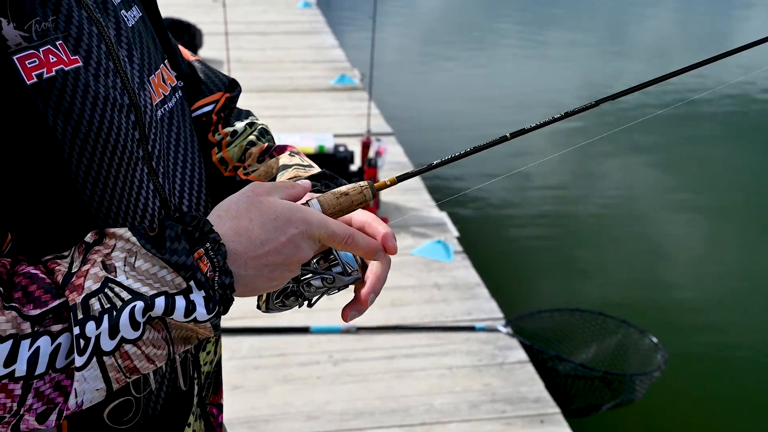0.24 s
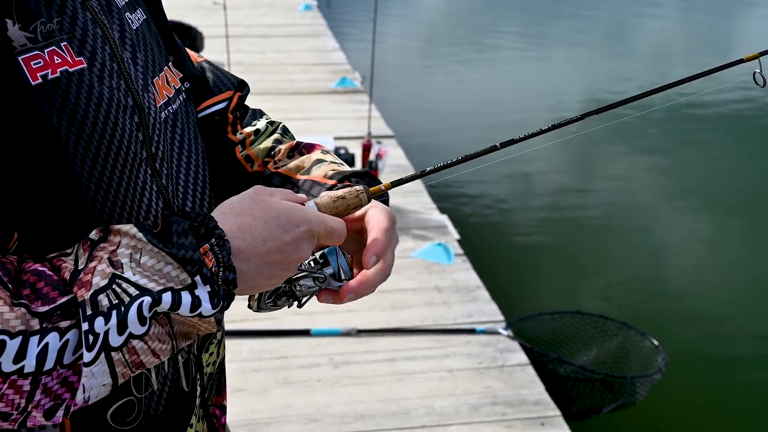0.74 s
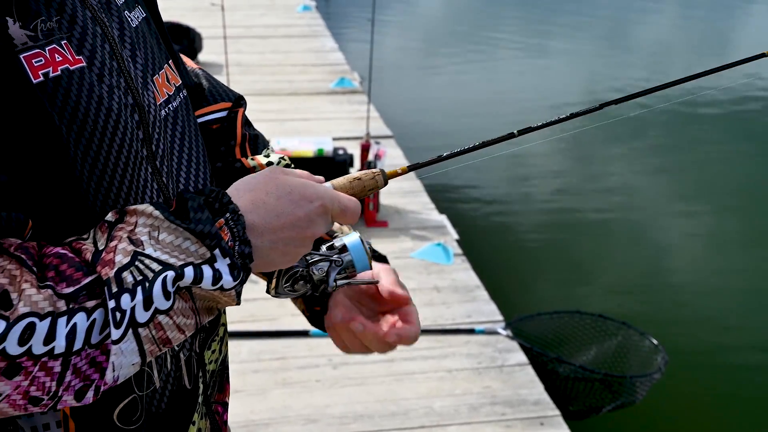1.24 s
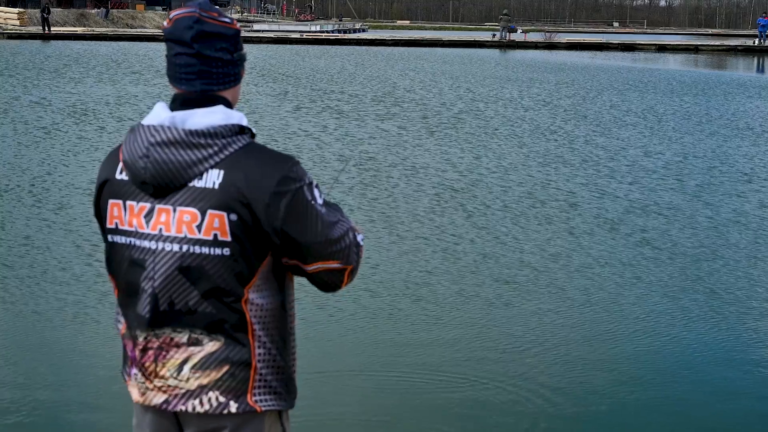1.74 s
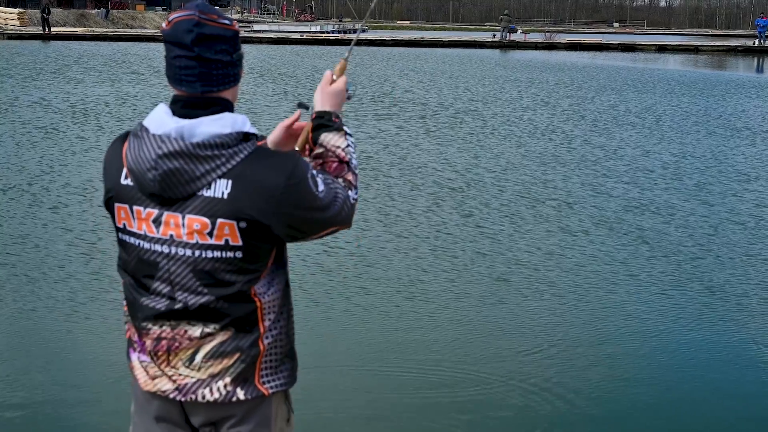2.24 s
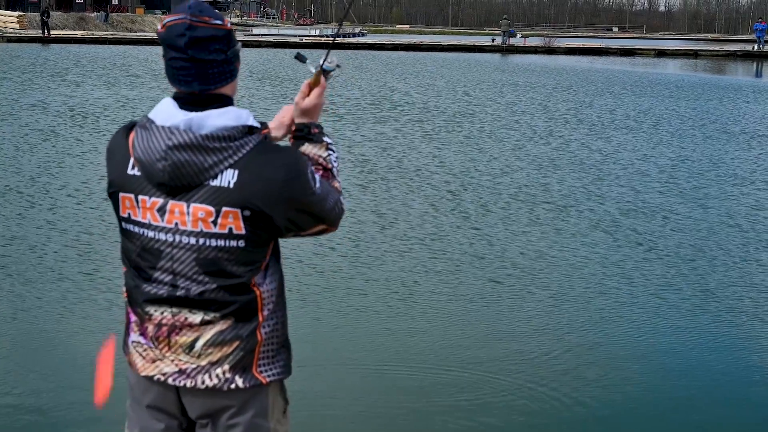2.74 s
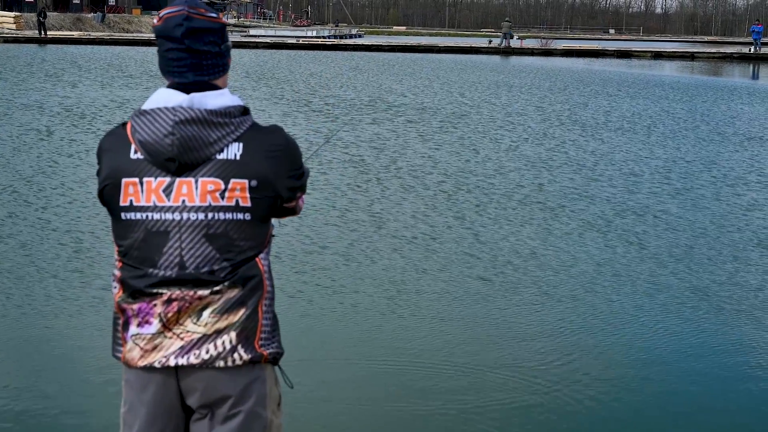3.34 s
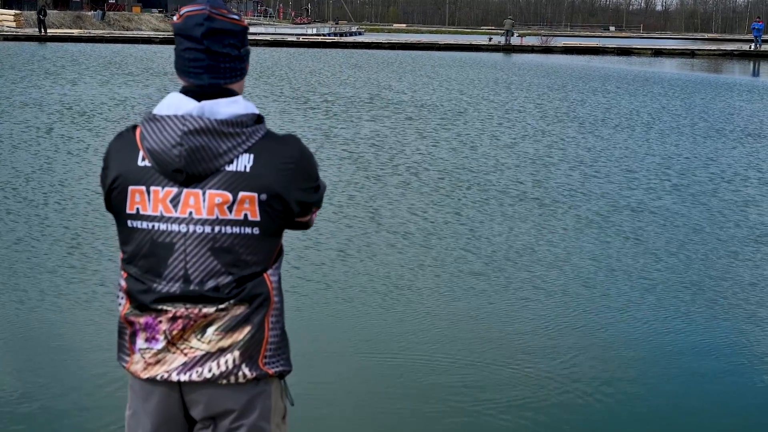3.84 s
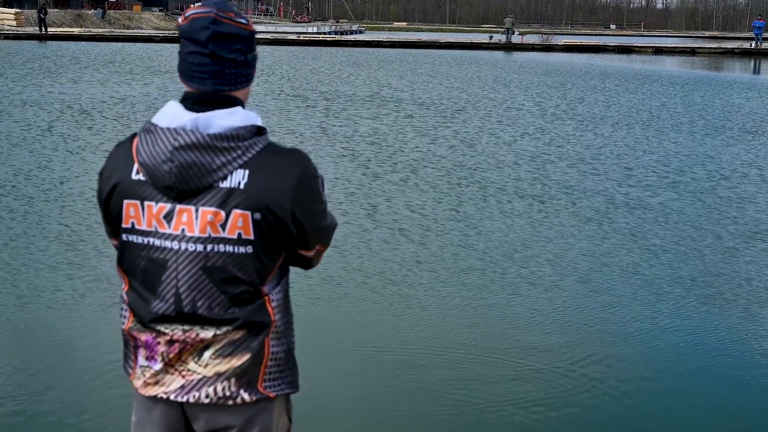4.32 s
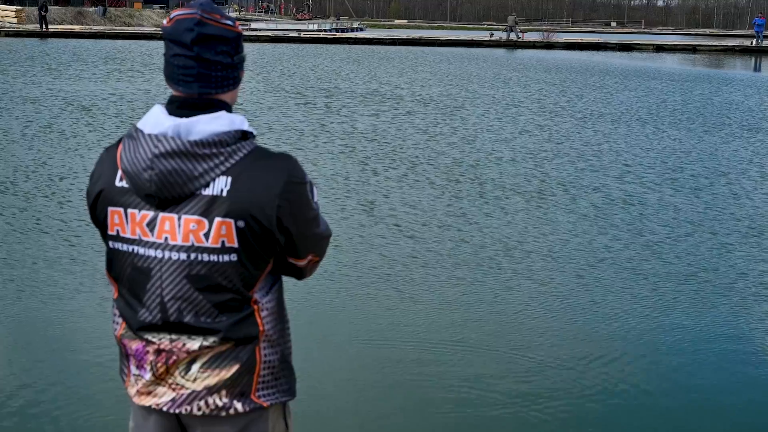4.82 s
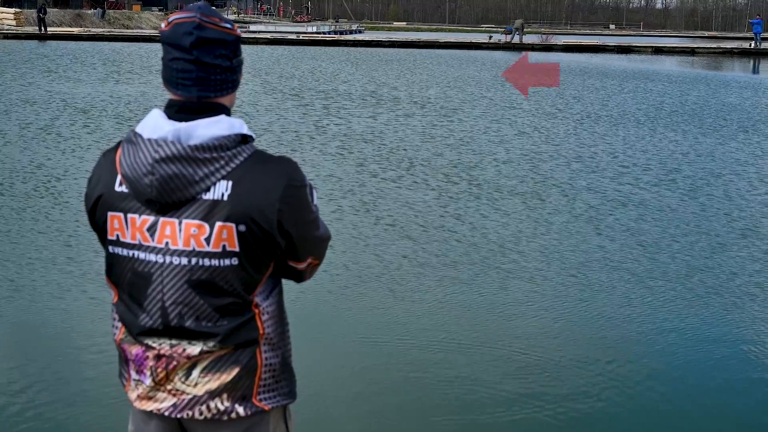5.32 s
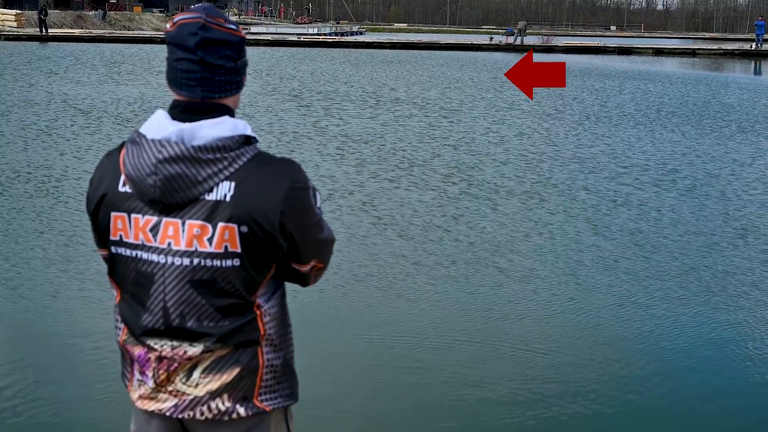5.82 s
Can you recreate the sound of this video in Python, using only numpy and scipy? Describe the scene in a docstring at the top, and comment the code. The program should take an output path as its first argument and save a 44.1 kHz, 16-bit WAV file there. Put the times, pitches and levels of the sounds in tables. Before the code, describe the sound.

A fishing reel clatters twice, then the rod whips with a sharp crack and whoosh, and line hisses away outdoors.

```python
"""By a pond, in a light breeze, a spinning rod is cast. The reel clatters twice as the bail is opened,
and its wire rings. Sleeves rustle as the rod goes back; it whips forward with a crack and a falling
whoosh of shed eddies. Line hisses off the spool, fainter and duller as drag slows the lure.
The tackle ticks, small waves lap, and a faint splash comes from out on the water."""
import sys
import numpy as np
from scipy import signal
from scipy.fft import rfft, irfft, next_fast_len
from scipy.io import wavfile
from scipy.ndimage import map_coordinates

SR = 44100
rng = np.random.default_rng(int(sys.argv[2]) if len(sys.argv) > 2 else 0)


def wrap_up_sound(samples):
    """Save the sound to the file named by the first command line argument, as 16-bit audio."""
    columns = np.atleast_2d(samples).T
    # keep every value between -1 and 1, then stretch to whole-number steps
    tamed = np.clip(columns, -1, 1)
    steps = np.round(tamed * 32767).astype(np.int16)
    wavfile.write(sys.argv[1], SR, steps)


N = 267687
TIME_S = np.arange(N) / SR
HAND_STOP_S, CRACK_S, FASTEST_S = 0.925, 2.928, 3.202  # hand damps reel, tip cracks, line runs fastest


def amp(db):
    """Decibels to gain."""
    return 10 ** (np.asarray(db) / 20)


def pan(left_db):
    """Stereo gains: left up, right down by left_db."""
    return amp([[left_db], [-left_db]])


def unit(x):
    """Scale to rms 1."""
    return x / np.sqrt(np.mean(x ** 2) + 1e-20)


def unit_hit(x):
    """Scale to the energy of 5 ms at rms 1."""
    return x / np.sqrt(np.sum(x ** 2) / (SR / 200))


def add(track, start_s, x):
    """Mix x into the track."""
    part = track[..., round(start_s * SR):][..., :x.shape[-1]]
    part += x[..., :part.shape[-1]]


def along(points, hz):
    """Interpolate (Hz, value) points on a log axis."""
    knots_hz, values = np.transpose(points)
    return np.interp(np.log(hz + 1), np.log(knots_hz + 1), values)


def filtered(x, response):
    """Apply a complex frequency response."""
    size = next_fast_len(x.shape[-1] + SR // 8)
    return irfft(rfft(x, size) * response(np.fft.rfftfreq(size, 1 / SR)), size)[..., :x.shape[-1]]


def coloured(x, spectrum):
    """Shape x by (Hz, dB) points."""
    return filtered(x, lambda hz: amp(along(spectrum, hz)))


def resonate(x, modes):
    """Pass x through (Hz, width Hz, dB) resonances of alternating sign."""
    return filtered(x, lambda hz: sum(
        (-1) ** k * amp(db) * 1j * hz * width / (centre ** 2 - hz ** 2 + 1j * hz * width)
        for k, (centre, width, db) in enumerate(modes)))


def swept(x, track_hz, gain):
    """Moving filter, output rms 1; gain is a function of octaves above the track."""
    hz, t, frames = signal.stft(x, SR, nperseg=1024)
    band = gain(np.log2((hz[:, None] + 20) / np.interp(t, TIME_S, track_hz)))
    power = np.mean(np.abs(frames) ** 2, axis=(0, 2)) @ band ** 2
    return unit(signal.istft(frames * band / np.sqrt(power + 1e-30), SR, nperseg=1024)[1][:, :N])


def wobble(rate_hz):
    """Random knots joined by straight lines."""
    return map_coordinates(rng.standard_normal(N // 8), [TIME_S * rate_hz], order=1)


def noise(spectrum):
    """Mono noise of rms 1, shaped by (Hz, dB) points."""
    return unit(coloured(rng.standard_normal(N), spectrum))


def wide_noise(spectrum, correlation):
    """Stereo noise of rms 1 with (Hz, left-right correlation) points."""
    def response(hz):
        angle = np.arccos(np.clip(along(correlation, hz), -1, 1)) / 2
        return amp(along(spectrum, hz)) * [np.cos(angle), np.sin(angle)]
    mid, side = filtered(rng.standard_normal((2, N)), response)
    return unit(np.array([mid + side, mid - side]))


def burst(t60_s, grain_db=4, impact=9):
    """One clean impact and a dying spurt of uneven micro-impacts."""
    t = np.arange(SR // 4) / SR
    sizes = amp(grain_db * np.interp(t, np.arange(1000) / 4000, rng.standard_normal(1000)))
    spurt = rng.standard_normal(len(t)) * sizes * amp(-60 * t / max(t60_s, 1e-3))
    spurt[20] += impact
    return spurt


def decay(start_s, t60_s):
    """Envelope: 1 until start_s, then dying."""
    return amp(-60 * np.maximum(TIME_S - start_s, 0) / t60_s)


def pulse(start_s, t60_s, attack_s):
    """Envelope: opens at start_s and dies."""
    age_s = np.maximum(TIME_S - start_s, 0)
    return (1 - np.exp(-age_s / attack_s)) * decay(start_s, t60_s)


def swell(peak_s, hold_s, rise_s, t60_s):
    """Envelope: climbs 60 dB in rise_s, reaches 1 at peak_s, holds, dies."""
    return amp(-60 * np.maximum(peak_s - TIME_S, 0) / rise_s) * decay(peak_s + hold_s, t60_s)


def swells(rows, rise_s, t60_s):
    """Power sum of (peak s, hold s, dB) swells."""
    return np.sqrt(sum((amp(db) * swell(s, hold_s, rise_s, t60_s)) ** 2 for s, hold_s, db in rows))


# Puffs of air. Each row: peak time in seconds, hold in seconds, level in dB.
GUSTS = [(0.0, .04, -64), (0.22, .01, -76.5), (0.55, 0.3, -65.5), (1.05, .05, -75.5), (1.37, 0.086, -61),
         (1.68, 0.028, -63.5), (1.79, 0.031, -60.5), (1.97, 0.43, -64.5), (2.44, 0.074, -62.5),
         (2.85, .05, -66)]
# Wind spectrum. Each row: frequency in Hz, level in dB.
BREEZE_SPECTRUM = [(15, -30.5), (25, 3), (121, -4), (200, -6), (555, -13), (817, -12), (1300, -20),
                   (2180, -25), (2360, -30.5), (12000, -51), (15600, -79), (22000, -120)]


def breeze(gain_db=2.5):
    """Soft puffs of air pass the angler."""
    return amp(gain_db) * swells(GUSTS, rise_s=0.73, t60_s=0.84) * noise(BREEZE_SPECTRUM)


# Hush of the pond. Each row: frequency in Hz, level in dB.
POND_SPECTRUM = [(20, -7), (60, 7.5), (110, -2), (250, -14.5), (700, -16.5), (1500, -23), (3000, -34.5),
                 (6000, -37.5), (11000, -41), (13000, -57.5)]
# Small waves. Each row: peak time in seconds, hold in seconds, level in dB.
WAVES = [(4.55, .13, -72.5), (4.95, 0.11, -68.5), (5.485, .005, -63.5), (5.6, 0.053, -79),
         (5.86, 0.021, -69.5)]


def pond(hush_db=-64, flutter_db=2.7):
    """The hush of open water sets in at the crack; later small waves lap."""
    hush = amp(hush_db + wobble(6)) * wide_noise(POND_SPECTRUM, [(100, 0.98), (2000, 0.894)])
    lapping = amp(flutter_db * wobble(55)) * swells(WAVES, rise_s=0.25, t60_s=0.26)
    water = noise([(150, -14.5), (250, 9.5), (450, -2.5), (900, 1.5), (1600, -14), (3500, -24),
                   (8000, -37)])
    return hush * (TIME_S > CRACK_S) + lapping * water


def splash(start_s=5.828, level_db=-58):
    """A faint, dull splash out on the water."""
    water = noise([(700, -20), (1400, -6), (1750, 8), (2100, 4), (2700, -17.5), (5000, -35),
                   (12000, -43.5)])
    return amp(level_db) * pulse(start_s, t60_s=0.2, attack_s=0.003) * water


# Sleeve strokes. Each row: peak time in seconds, hold in seconds, level in dB, treble gain in dB.
SLEEVE_STROKES = [(1.348, .12, -73.5, 2.5), (1.783, 0.17, -68.5, -9), (2.068, 0.11, -58.5, -7.5),
                  (2.24, .03, -58.5, 0.5), (2.365, 0.18, -62.5, 0), (2.784, .02, -70, 6)]
# Rubbing cloth. Each row: frequency in Hz, level in dB.
CLOTH_SPECTRUM = [(410, -33.5), (700, -7.5), (830, -5), (1330, -7.5), (1800, 0), (2080, -4.5), (2880, -5),
                  (3410, -14), (3790, -13), (4320, -16.5), (5600, -19), (6900, -21.5), (8530, -14),
                  (10000, -20), (12600, -22), (14600, -28), (16000, -30)]


def sleeves(split_hz=7300, grain_db=1.2):
    """Jacket cloth rubs as the rod is drawn back."""
    out = np.zeros(N)
    for peak_s, hold_s, db, treble_db in SLEEVE_STROKES:
        cloth = unit(noise(CLOTH_SPECTRUM) * amp(grain_db * wobble(170)))
        treble = filtered(cloth, lambda hz: hz ** 6 / (hz ** 6 + split_hz ** 6))
        stroke = amp(db) * swell(peak_s, hold_s, rise_s=0.42, t60_s=0.76)
        out += stroke * (cloth - treble + treble * amp(treble_db))
    return out


# Line and reel ticks. Each row: start in seconds, knock level in dB, edge level in dB,
# T60 in seconds, left minus right in dB, edge cutoff in Hz.
TICKS = [(1.465, -59, -68.5, 0.032, 0, 8985), (3.594, -50, -72, 0.037, 2, 4490),
         (3.762, -49.5, -53, 0.032, -8, 4610), (4.283, -58.5, -75, 0.031, 4, 4040),
         (4.457, -54, -73, 0.021, 1, 3986), (4.934, -65.5, -84, 0.08, -3, 3456),
         (5.314, -64.5, -76, .09, 1, 4510), (5.395, -76, -73, 0.041, 17, 15040),
         (5.457, -53.5, -53, 0.036, 0.5, 14900), (5.483, -60.5, -80, .06, 0, 14950),
         (5.598, -84, -74, 0.047, 13, 15020), (5.641, -63.5, -60, 0.078, 12.5, 15000)]
# Knock resonances. Each row: frequency in Hz, width in Hz, level in dB.
TICK_MODES = [(911, 370, 2.5), (1350.7, 133, 3), (1670, 130, 6), (2100, 220, -3), (2476, 100, 1.5)]
# Bright edge of a tick. Each row: frequency in Hz, level in dB.
TICK_EDGE = [(2500, -41), (4000, 12), (4400, 7), (4900, 9), (5400, -3), (5940, 11), (7000, 3), (9500, 0.5),
             (14000, 7), (15500, -6), (16500, -25)]


def ticks():
    """The tackle gives small dry knocks, some with a bright edge."""
    out = np.zeros((2, N))
    for start_s, knock_db, edge_db, t60_s, balance_db, cutoff_hz in TICKS:
        knock = coloured(resonate(burst(t60_s), TICK_MODES), [(3000, -1), (7000, -12)])
        edge = coloured(burst(0.7 * t60_s), TICK_EDGE)
        edge = filtered(edge, lambda hz: 1 / (1 + (hz / cutoff_hz) ** 6))
        tick = amp(knock_db) * unit_hit(knock) + amp(edge_db) * unit_hit(edge)
        add(out, start_s, tick * pan(balance_db / 2))
    return out


def grip(level_db=-54):
    """The hand rumbles on the rod while it works the reel."""
    rumble = noise([(25, 2.5), (60, -9), (130, -20), (600, -13), (1500, -29), (5000, -60)])
    return amp(level_db) * swell(peak_s=0.36, hold_s=0.54, rise_s=0.12, t60_s=0.11) * rumble


# Slides in the reel. Each row: peak time in seconds, hold in seconds, level in dB.
SLIDES = [(0.335, .02, -54), (0.385, .045, -34.5), (0.465, 0.026, -27), (0.58, .11, -58),
          (0.72, 0.046, -38), (0.80, .015, -30.5), (0.85, 0.061, -20.5)]
# Sliding friction. Each row: frequency in Hz, level in dB.
SLIDE_SPECTRUM = [(59, -46.5), (100, -18.5), (634, -17), (1200, -3), (1650, -6), (1950, -6), (2220, -11),
                  (3250, -8.5), (4200, -10.5), (4980, -16.5), (8280, -18), (10200, -22), (11900, -21),
                  (14700, -28.5), (16000, -46)]


def reel_scrape(gain_db=-2, grain_db=4):
    """Reel parts scrape between contacts."""
    friction = unit(noise(SLIDE_SPECTRUM) * amp(grain_db * wobble(700)))
    return amp(gain_db) * swells(SLIDES, rise_s=0.086, t60_s=0.21) * friction


# Blows on the bail. Each row: start in seconds, low-mode gain in dB, high-mode gain in dB.
BAIL_BLOWS = [(0.475, -15.5, -11), (0.481, -21.5, -36), (0.719, -36, -32.5), (0.771, -43.5, -28.5),
              (0.838, -32.5, -28.5), (0.898, -25, -20.5)]
# Wire modes. Each row: frequency in Hz, level in dB, T60 in seconds.
WIRE_MODES = [(1160, -6, 0.084), (1893, -2, 0.1), (3680, -15, .12), (4540, -9.5, 0.071), (4452, -19.5, .12),
              (8400, -24, .07), (11600, 1.5, 0.029), (11600, -24.5, 0.19), (12210, -8, .06),
              (13800, -17, .05)]


def bail_wire(split_hz=6000, scatter_db=4.4, detune=0.00087):
    """The springy wire rings after each blow until the hand closes on it."""
    out, t = np.zeros(N), np.arange(SR // 2) / SR
    for start_s, low_db, high_db in BAIL_BLOWS:
        for hz, db, t60_s in WIRE_MODES:
            level_db = db + (low_db if hz < split_hz else high_db) + rng.normal(0, scatter_db)
            tone = np.sin(2 * np.pi * hz * (1 + rng.normal(0, detune)) * t)
            add(out, start_s, amp(level_db - 60 * t / t60_s) * tone)
    return out * decay(HAND_STOP_S, t60_s=0.018)


# Hinge resonances. Each row: frequency in Hz, width in Hz, level in dB.
HINGE_MODES = [(1870, 60, -2.5), (4160, 220, 1), (4567, 260, 0.5), (5953, 600, -11), (8450, 700, -14.5),
               (12000, 250, -10)]


def bail_hinge(level_db=-24):
    """The bail chatters in its hinge after the first blow."""
    out = np.zeros(N)
    chatter = unit_hit(resonate(burst(t60_s=0.2), HINGE_MODES))
    add(out, BAIL_BLOWS[0][0], amp(level_db) * chatter)
    return out


# Reel contacts. Each row: start in seconds, level in dB, hardness in dB, relative thud in dB,
# T60 in seconds.
CONTACTS = [(0.3284, -45.5, -7.5, -5.5, 0.057), (0.3439, -42.5, -3, -13.5, 0.023),
            (0.3535, -17.5, -10, -22, 0.037), (0.382, -15.5, 4, -29, 0.016),
            (0.3855, -24, -7, -19.5, 0.007), (0.392, -28.5, 3.5, -17.5, 0.1), (0.428, -21, -3, -16, 0.093),
            (0.444, -21, 0, -16.5, 0.039), (0.4503, -14.5, -2, -30.5, .023),
            (0.454, -12.5, 0.5, -22.5, 0.068), (0.4605, -10.5, -2.5, -22.5, 0.024),
            (0.4642, -15, 2.5, -23, 0.014), (0.47, -16.5, 2, -20.5, 0.054),
            (0.4751, -16, 4.5, -28.5, 0.0062), (0.479, -18.5, 1, -20, 0.067),
            (0.7061, -34.5, 0.5, -14.5, .025), (0.717, -25.5, 5, -22.5, 0.062),
            (0.724, -26.5, 1, -17, 0.078), (0.762, -16.5, -6, -23, .023), (0.769, -28.5, 2, -17.5, 0.026),
            (0.791, -28, 1, -17, .07), (0.8346, -20, 3, -24, .029), (0.8384, -12, 3, -29.5, .044),
            (0.845, -13.5, 1.5, -24.5, 0.049), (0.8517, -6, 1, -18, 0.034), (0.8651, -15.5, 5, -20.5, 0.04),
            (0.8937, -7, 2.5, -13, 0.073), (0.9091, -11, -1, -17, 0.021)]
# Reel resonances. Each row: frequency in Hz, width in Hz, level in dB.
HOUSING_MODES = [(950, 120, -4), (1034, 140, -2), (1186, 70, 1.5), (1318.3, 38, 0), (1482, 87, -9)]
ROTOR_MODES = [(1725, 80, -3.5), (1990, 80, 0), (2170, 150, -1.5), (2397, 90, 2), (2937, 94, -2.5)]
METAL_MODES = [(3990, 1300, -2), (4350, 140, -0.5), (4326, 110, 4), (5080, 430, -2.5), (5796, 110, 2.5),
               (6600, 240, -5), (7170, 160, -4), (7793, 79, -3), (8530, 160, -11), (8900, 150, -11.5)]
# Thud of the reel foot on the rod, and a contact's bright edge. Each row: frequency in Hz, level in dB.
FOOT_THUD = [(40, -17.5), (120, -10), (240, 2), (400, -6.5), (700, -1.5), (900, -8), (1400, -33.5)]
CONTACT_EDGE = [(3000, -29.5), (8000, -6.5), (10500, -1), (12500, -2.5), (14800, -4), (16000, -22.5)]


def reel_clatter(housing_db=-4.5, rotor_db=-8.5, metal_db=-6, edge_db=-14, scatter_db=7.5):
    """Contacts ring the reel; harder ones give more metal and edge, less housing."""
    out = np.zeros(N)
    for start_s, level_db, hard_db, thud_db, t60_s in CONTACTS:
        metal_modes = [(hz, width, db + rng.normal(0, scatter_db)) for hz, width, db in METAL_MODES]
        hit = amp(thud_db) * unit_hit(coloured(burst(t60_s), FOOT_THUD))
        hit += amp(housing_db - 0.3 * hard_db) * unit_hit(resonate(burst(0.4 * t60_s), HOUSING_MODES))
        hit += amp(rotor_db) * unit_hit(resonate(burst(0.58 * t60_s), ROTOR_MODES))
        hit += amp(metal_db + hard_db) * unit_hit(resonate(burst(1.1 * t60_s), metal_modes))
        hit += amp(edge_db + 0.98 * hard_db) * unit_hit(coloured(burst(t60_s), CONTACT_EDGE))
        add(out, start_s, amp(level_db) * hit)
    return out


# Running line. Each row: frequency in Hz, level in dB.
LINE_SPECTRUM = [(260, -22.5), (450, -9.5), (586, -10.5), (709, -7), (910, -7), (1020, -5.5), (1200, -7),
                 (1950, -5), (2780, -7.5), (3890, -11), (4990, -15.5), (6890, -12), (8220, -16.5),
                 (10200, -15), (15000, -24)]
# Its stereo image. Each row: frequency in Hz, left-right correlation.
LINE_CORRELATION = [(100, 0.65), (600, .88), (2000, 0.85), (6000, 0.65), (12000, .25)]


def line_hiss(level_db=-38, db_per_decade=54, edge_hz=10070, half_speed_s=0.58, slack_s=4.6):
    """Coils leave the spool and brush the rings; the hiss fades and dulls as drag slows the lure."""
    speed = 1 / (1 + np.maximum(TIME_S - FASTEST_S, 0) / half_speed_s)
    slack_db = -6.5 * np.clip((TIME_S - slack_s) / 0.17, 0, 1)  # the lure comes down
    gain = amp(level_db + db_per_decade * np.log10(speed) + slack_db)
    payout = amp(np.interp(TIME_S, [CRACK_S, FASTEST_S], [-4, 0]))  # first coils leave gently
    running = payout * swell(CRACK_S, hold_s=2.36, rise_s=0.28, t60_s=0.3)
    surge = amp(-2.5) * swell(peak_s=3.16, hold_s=0.06, rise_s=0.508, t60_s=0.53)
    friction = wide_noise(LINE_SPECTRUM, LINE_CORRELATION)
    hiss = swept(friction, edge_hz * speed, lambda octaves: 1 / np.sqrt(1 + 4 ** (2.9 * octaves)))
    flutter = amp(2 * wobble(130))
    return gain * (running + surge) * unit(hiss * flutter)


def line_whirr(level_db=-35, pitch_hz=937, octaves_per_s=6.7, width_octaves=0.12):
    """At full speed a spinning loop of line whirrs, gliding upward."""
    rise_s, hold_s = 0.066, 0.031
    track_hz = pitch_hz * 2 ** (octaves_per_s * np.clip(TIME_S - FASTEST_S, -rise_s, hold_s))
    friction = wide_noise(LINE_SPECTRUM, LINE_CORRELATION)
    whirr = swept(friction, track_hz, lambda octaves: np.exp(-0.5 * (octaves / width_octaves) ** 2))
    return amp(level_db) * swell(FASTEST_S, hold_s, rise_s, t60_s=0.08) * whirr


def line(left_lag_s=0.00004):
    """Hiss and whirr of the line, slightly later on the left."""
    delay_s = np.array([[0.5], [-0.5]]) * left_lag_s
    return filtered(line_hiss() + line_whirr(), lambda hz: np.exp(-2j * np.pi * hz * delay_s))


# Rod modes. Each row: frequency in Hz, level in dB, T60 in seconds.
ROD_MODES = [(175, -21.5, .1), (250.5, -15, .12), (322, -20, 0.1202), (649.5, -17.5, .07)]


def rod_shudder():
    """The whip rings the rod briefly at a few low modes."""
    t = TIME_S - CRACK_S
    ring = sum(amp(db) * pulse(CRACK_S, t60_s, attack_s=0.0018) * np.sin(2 * np.pi * hz * t)
               for hz, db, t60_s in ROD_MODES)
    return ring * pan(left_db=1.5)


# Rod sweeps: whip, follow-through, three rebounds, settling.
# Each row: peak time in seconds, level in dB, rise in seconds, T60 in seconds.
ROD_SWEEPS = [(2.934, -16, 0.023, 0.23), (2.99, -31, 0.16, 0.91), (3.135, -54, .2, 0.15),
              (3.205, -34, 0.1, 0.27), (3.269, -37, 0.15, 0.34), (3.5, -57, 0.77, 2.3)]


def rod_whoosh(rest_hz=237.7, lift_hz=260, width_octaves=0.38, shelf_db=-10, flutter_db=2):
    """The rod sheds eddies: a noise band that falls as the rod slows, over a shelf of rumble."""
    def band(octaves):
        return np.exp(-0.5 * (octaves / width_octaves) ** 2) + amp(shelf_db) / (1 + np.exp(4 * octaves))
    power = sum((amp(db) * swell(s, 0, rise_s, t60_s)) ** 2 for s, db, rise_s, t60_s in ROD_SWEEPS)
    centre_hz = rest_hz + lift_hz * swell(ROD_SWEEPS[0][0], hold_s=0, rise_s=0.06, t60_s=0.4)
    air = wide_noise([(25, -1), (100, 8.5), (16000, -14)], correlation=[(100, 1), (600, 0.72)])
    flutter = amp(flutter_db * wobble(35))
    return np.sqrt(power) * flutter * swept(air, centre_hz, band) * pan(left_db=1)


# Low and bright parts of the crack. Each row: frequency in Hz, level in dB.
THUMP_SPECTRUM = [(20, -25.5), (45, -5), (130, -5.5), (270, -3), (450, -13.5), (660, -2.5), (820, -13),
                  (2000, -24.5), (5000, -46)]
SNAP_SPECTRUM = [(100, -6.5), (500, 3), (1200, -4.5), (3000, -5), (6000, -7), (10000, -8.5), (15000, -5.5),
                 (16500, -26.5)]


def rod_crack(thump_db=-3, snap_db=-8, spray_db=-26, ceiling=0.75):
    """The tip whips through: a thump and a bright snap with a short spray, flattened at the peak."""
    low = wide_noise(THUMP_SPECTRUM, correlation=[(300, 0.94)])
    bright = wide_noise(SNAP_SPECTRUM, correlation=[(500, 0.391), (2000, 0.86), (6000, 0.039)])
    thump = amp(thump_db) * unit_hit(pulse(CRACK_S, t60_s=0.06, attack_s=0.00036) * low)
    snap = amp(snap_db) * pulse(CRACK_S, t60_s=0.075, attack_s=0.000801) * bright
    spray = amp(spray_db) * pulse(CRACK_S, t60_s=0.3, attack_s=0.02) * bright
    crack = (thump + snap + spray) * pan(left_db=4.5)
    return ceiling * np.tanh(crack / ceiling)


def scene():
    """Reel and clothes sit in the centre; the cast spreads wide."""
    reel = (reel_clatter() + reel_scrape()) * decay(HAND_STOP_S, t60_s=0.028)
    handling = reel + grip() + bail_wire() + bail_hinge() + sleeves()
    cast = rod_whoosh() + rod_crack() + rod_shudder() + line()
    return handling + cast + ticks() + splash() + breeze() + pond()


def record(dry, ceiling=0.82, cutoff_hz=15800):
    """Peaks are rounded and the top band is cut; a DC offset sets in with the cast."""
    rounded = dry / (1 + np.abs(dry / ceiling) ** 6) ** (1 / 6)
    offset = np.interp(TIME_S, [2.885, 2.905], [0, 1]) * np.array([[0.0215], [0.0322]])
    return filtered(rounded, lambda hz: 1 / (1 + (hz / cutoff_hz) ** 90)) + offset


dry = scene()
out = record(dry)
wrap_up_sound(out)
```